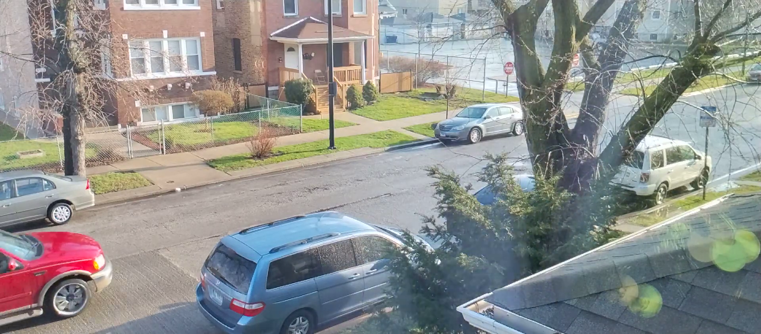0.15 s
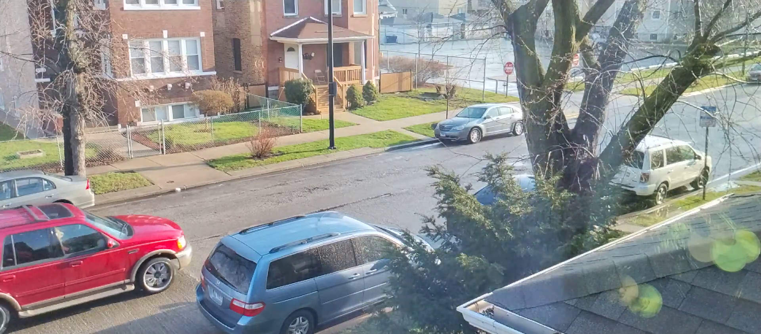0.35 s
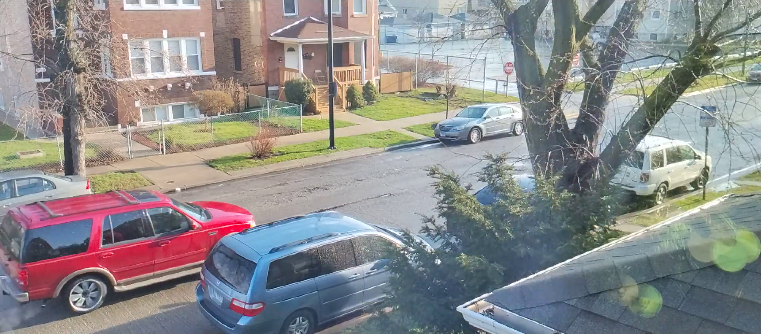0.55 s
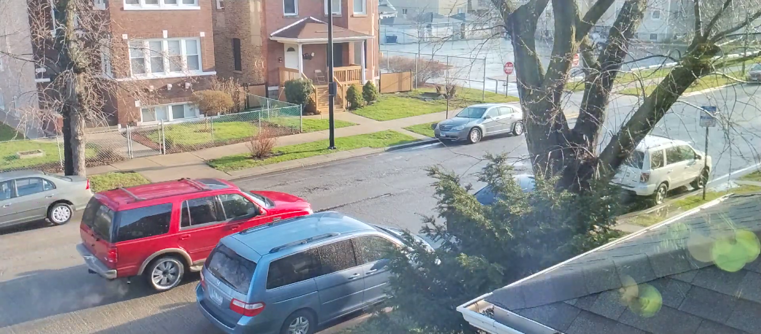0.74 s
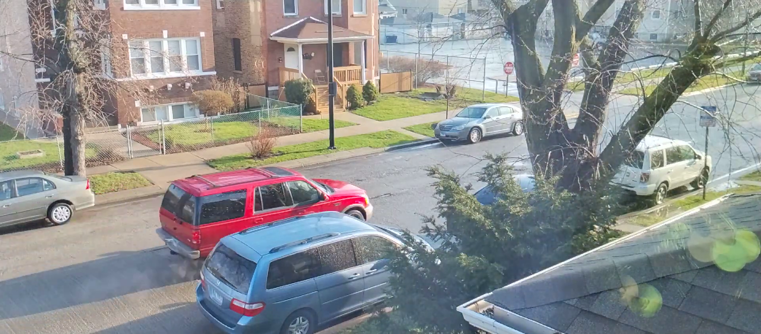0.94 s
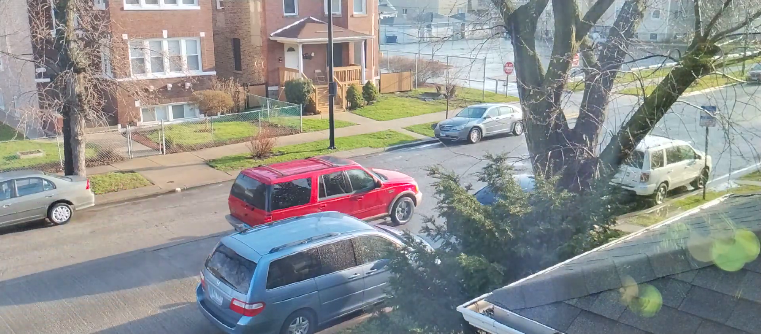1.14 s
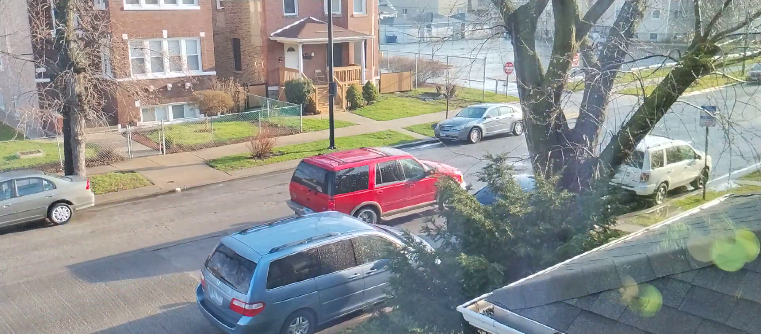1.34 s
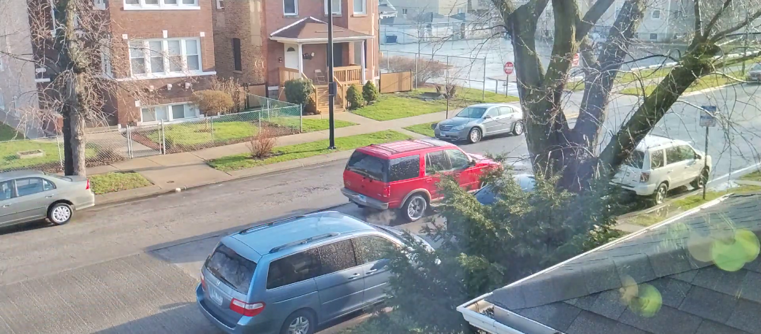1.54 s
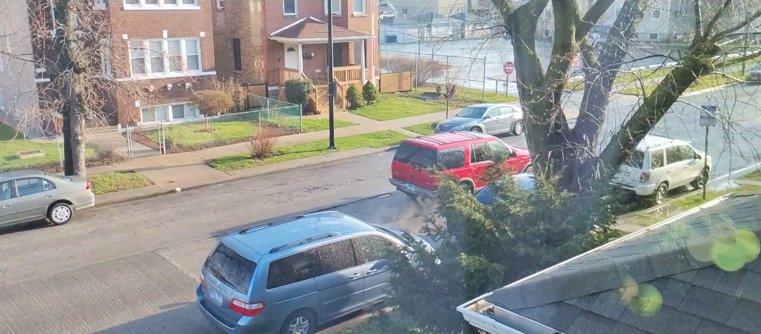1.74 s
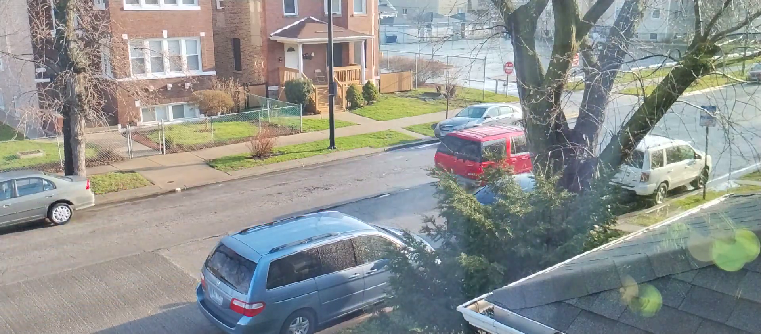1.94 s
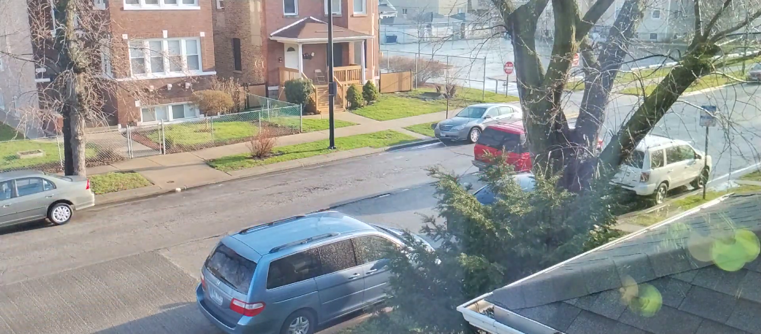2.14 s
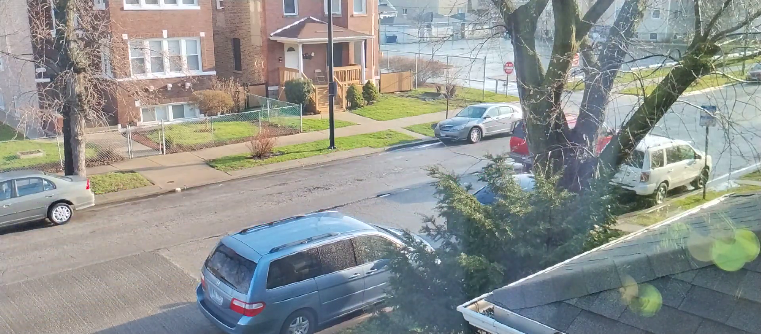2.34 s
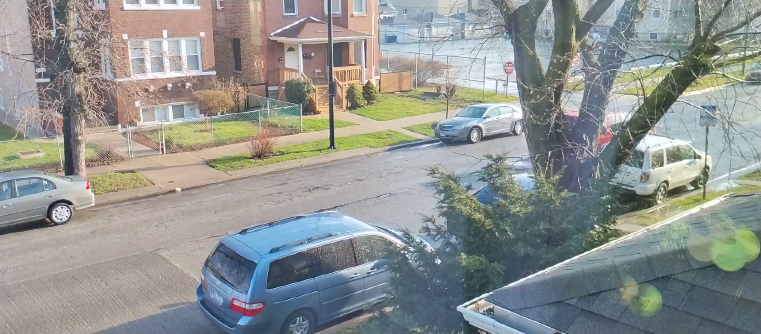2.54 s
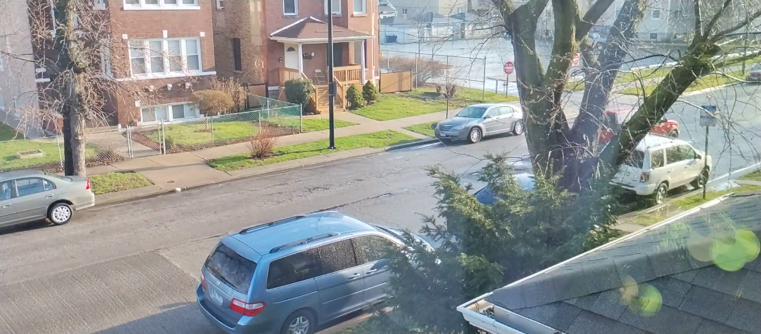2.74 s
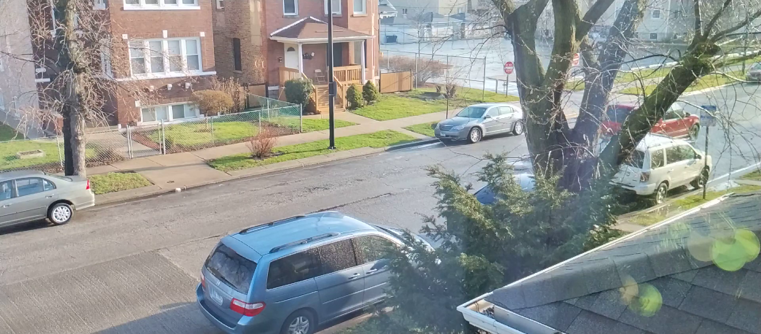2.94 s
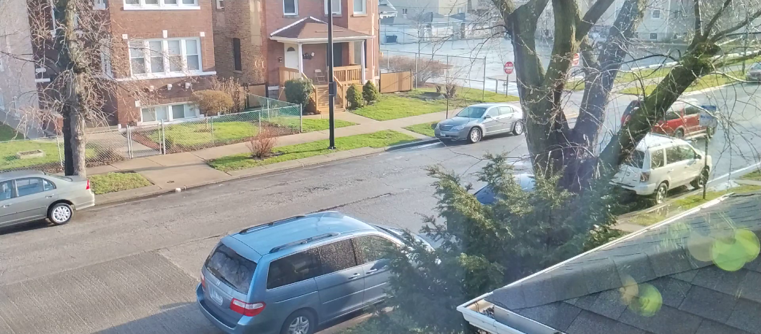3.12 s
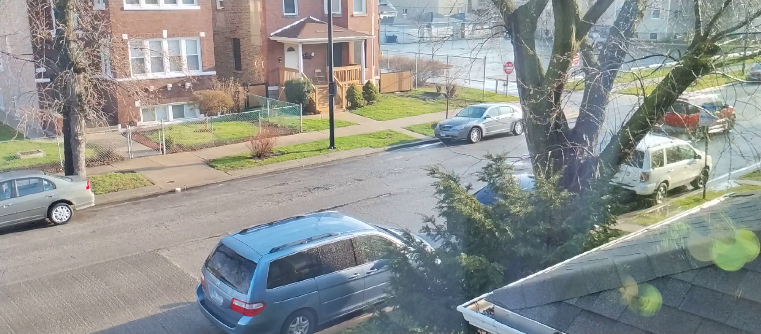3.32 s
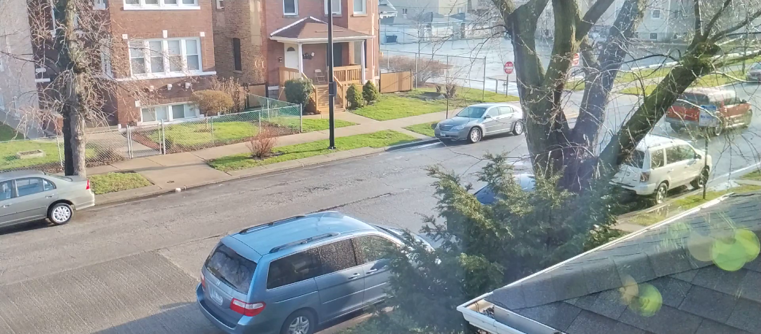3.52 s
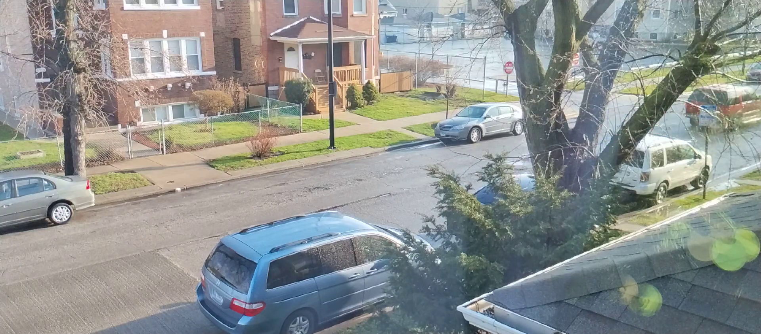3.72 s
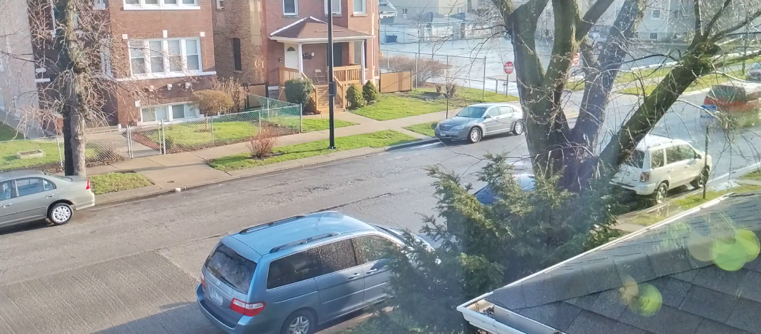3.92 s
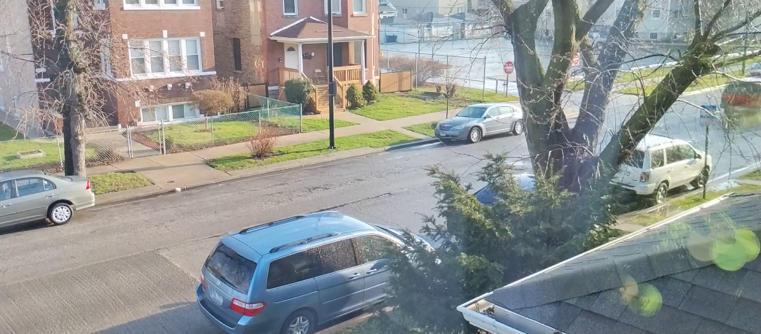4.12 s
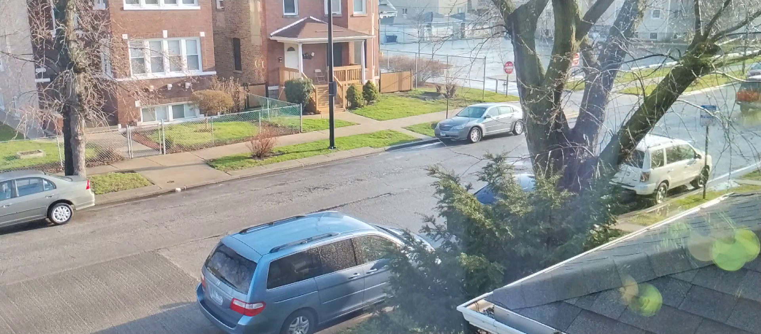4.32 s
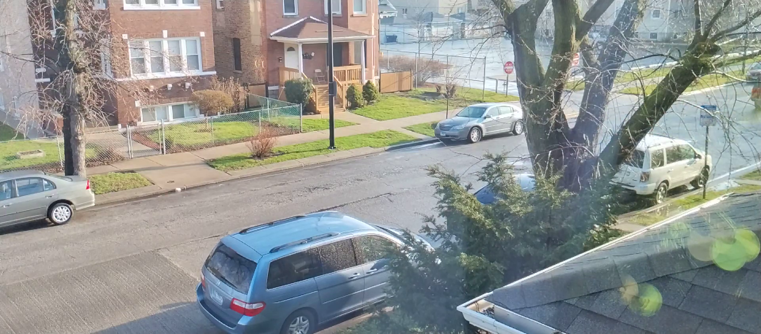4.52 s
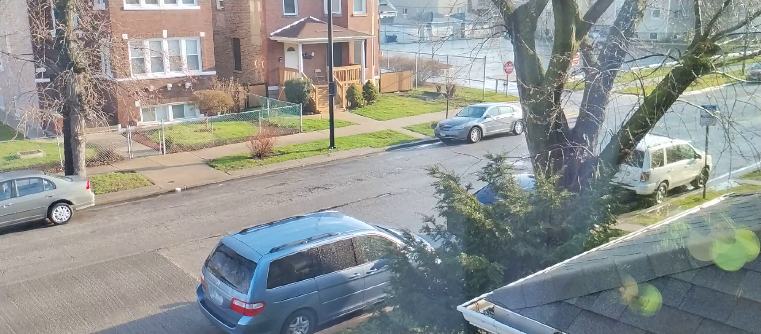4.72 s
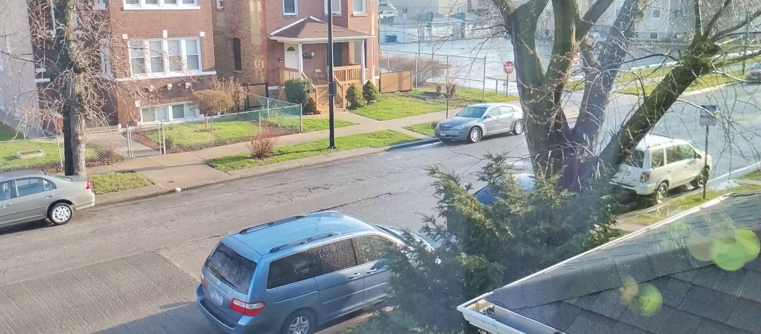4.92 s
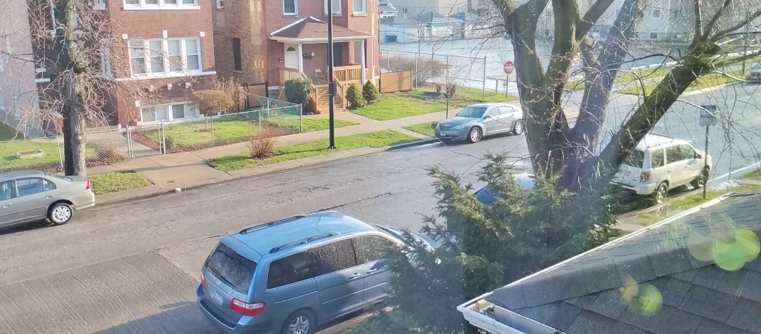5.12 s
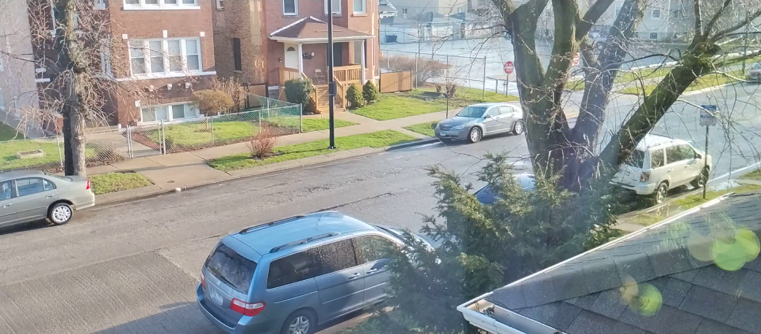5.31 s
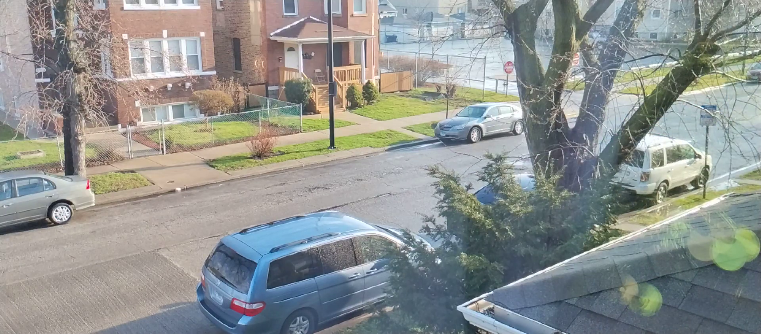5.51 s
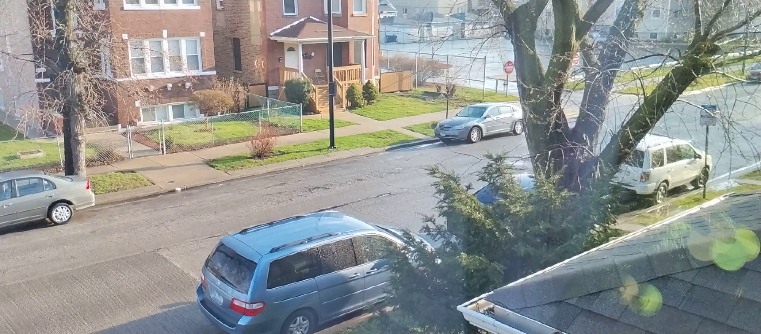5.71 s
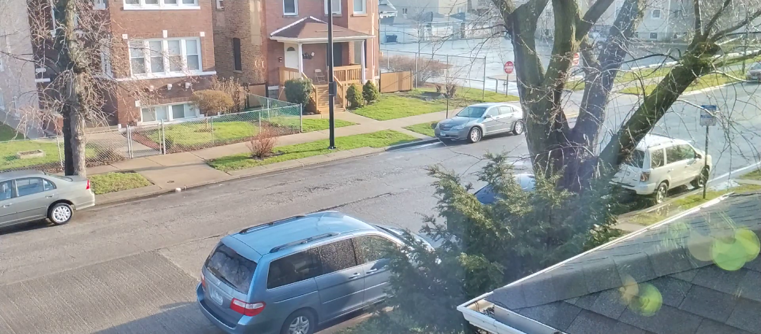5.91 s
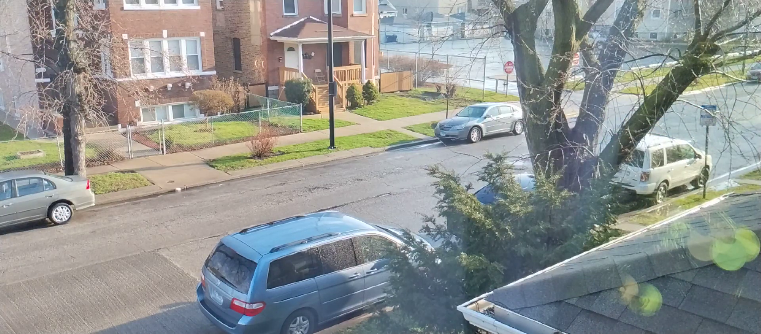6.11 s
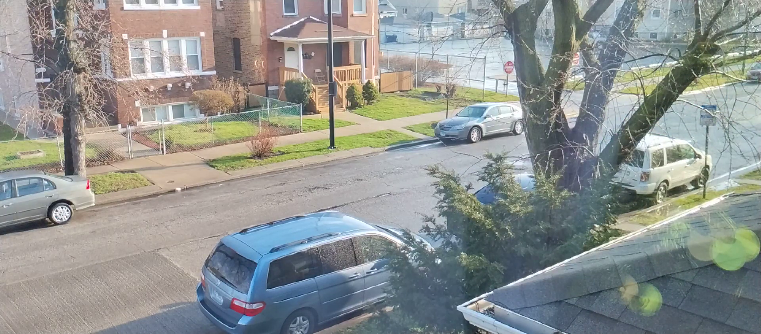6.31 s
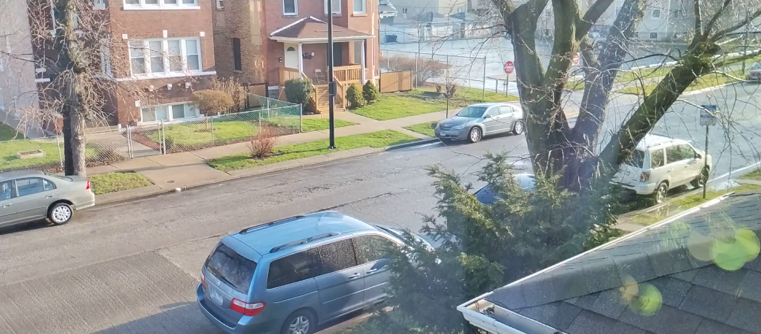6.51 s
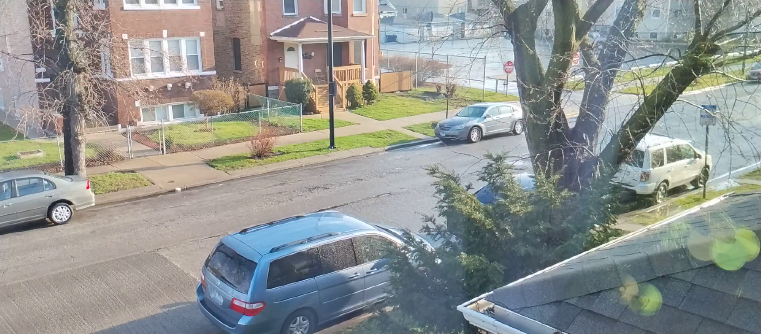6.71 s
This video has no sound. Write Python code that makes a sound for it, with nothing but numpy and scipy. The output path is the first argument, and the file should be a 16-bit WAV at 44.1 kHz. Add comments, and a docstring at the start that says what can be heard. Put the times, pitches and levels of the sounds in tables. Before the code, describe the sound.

Close inside a bare upstairs room, a window frame is pushed along its track in two rough bursts, rumbling, scraping and thudding. A car's low muffled rumble passes beneath and fades, and a smooth surface swishes by. The movement dies away, a hard catch snaps with a brief metallic ring, then quiet footfalls, small knocks, clicks and rustles remain over faint hiss.

```python
"""Indoors at an upstairs window, a frame, something like a sash, judders along its track in two pushes: noisy
friction follows the push, and blows mark the jolts. Meanwhile a car rolls by below, low filtered noise that
follows its distance, and a surface swishes past on dense slips. The frame bumps home under a faint high hiss
and a catch snaps shut with ringing modes. Then footfalls, small knocks, clicks and soft rustles of sparse
slips sound in the bare room. A faint steady hiss lies under it all."""
import sys
import numpy as np
from scipy import signal
from scipy.fft import rfft, irfft, next_fast_len
from scipy.io import wavfile
from scipy.ndimage import uniform_filter1d

SR = 44100
rng = np.random.default_rng(int(sys.argv[2]) if len(sys.argv) > 2 else 0)


def master(y):
    """Save y as 16-bit WAV."""
    cut = np.clip(np.atleast_2d(y).T, -1, 1)
    pcm = np.round(cut * 32767)  # scale
    wavfile.write(sys.argv[1], SR, pcm.astype(np.int16))


N = 297965  # samples

# Colour tables give relative spectra; blow levels hold before ring boost and stereo balance.

# frame pushed twice, then settling: time_s, push_rumble_db, binding_scrape_db
SLIDE_LEVELS = [(0,-47,-43.5),(.1,-46,-45),(.15,-49,-50.5),(.32,-48,-52),(.42,-41,-44),(.59,-44,-50.5),(.65,-52,-60),(.8,-46.5,-55),(1.08,-45.5,-51),(1.2,-39.5,-44.5),(1.35,-41,-37),(1.48,-42.5,-52),(1.68,-41,-52),(1.96,-45,-54),(2.12,-62,-77),(2.4,-79,-65),(2.75,-63.5,-69),(3.05,-107,-84.5)]
# friction spectrum of the frame: freq_hz, density_db_per_hz
SLIDE_SPECTRUM = [(24,-77),(45,-30),(72,-0.5),(105,9),(135,-3.5),(240,-2.5),(380,-17),(550,-15),(900,-21),(1250,-19),(1500,-16.5),(3060,-17),(4320,-26),(6710,-26.5),(14000,-53)]
RASP_RE_RUMBLE_DB = -10


def sliding_frame():
    """The push makes the frame rumble and the track rasp; the edges scrape where they bind."""
    slips = friction(SLIDE_SPECTRUM, slips_per_s=900, spread_db=-1.5, t60_s=0.17)
    rumble, scrape, rasp = [levelled(part) for part in zones(slips)]
    push, binding = gains(SLIDE_LEVELS)
    return push * (rumble + amp(RASP_RE_RUMBLE_DB) * rasp) + binding * scrape


# frame jolts in its track: start_s, thud_db, clack_minus_thud_db, t60_s, ring_hz, ring_boost_db
JOLT_BLOWS = [(.191,-41,-10.5,.26,527,9),(.218,-46.5,-7.5,0.094,704,10),(.256,-45,-8,0.3,603,6),(.335,-43.5,-19,0.32,376,9),(.412,-32,-31.5,0.204,173,-2),(0.474,-43,-16,0.12,230,0),(.514,-53.5,-16,0.35,136,16),(1.115,-48.5,-11,0.24,286,24),(1.222,-41,-29,0.54,133,9),(1.512,-31,-34.5,0.35,200,4),(1.775,-45,-15.5,0.091,570,10.5),(1.851,-34.5,-12,0.38,233,5.5),(2.153,-59.5,-17,0.24,110,13),(2.508,-47,-13,0.3,460,3),(2.548,-58,2.5,0.13,258,19.5)]
# spectrum of the jolts: freq_hz, density_db_per_hz
JOLT_SPECTRUM = [(24,-30),(40,-14.5),(115,3),(222,-7.5),(421,-10.5),(620,-10),(900,-14),(1580,-18.5),(2400,-19.5),(3300,-22),(4320,-31.5),(6390,-32),(9000,-55),(14000,-91)]


def jolts():
    """The frame bumps along its track: millisecond contacts with a strong first front."""
    return sum(blow(*row, JOLT_SPECTRUM, contact_s=0.002, middle_db=0.5, direct=3.0, q=7.8)
               for row in JOLT_BLOWS)


# catch snap and rebounds: start_s, thud_db, clack_minus_thud_db, ring_hz
CATCH_SNAPS = [(3.141,-54,8,503),(3.149,-48.5,9.5,1720),(3.166,-48.5,7,440),(3.186,-47.5,-3,214)]
# spectrum of hard contacts, catch and ticks: freq_hz, density_db_per_hz
HARD_SPECTRUM = [(35,-44),(60,-15),(160,-7.5),(215,2),(348,-10),(512,-3),(738,-8),(886,-1),(1090,-7.5),(1300,-3),(2500,-5),(4300,-19.5),(6000,-23),(6900,-28.5),(8000,-38.5),(14000,-66)]
# metal of the catch ringing on: freq_hz, level_re_ring_db, t60_s
METAL_MODES = [(1210, -13, 0.42), (1300, -16, 0.28), (1590, 0, 0.14), (1879, -11, 0.28), (2040, -12, 0.39),
               (2480, -11, 0.33), (2660, -1, 0.35), (2918, -6, 0.19), (3200, -22, 0.39), (3620, -14, 0.24),
               (3801, -21, 0.27), (5070, -21, 0.18), (5464, -32, 0.47), (6002, -27, 0.32)]
SNAP_T60_S, CATCH_RING_DB = 0.33, -45


def catch():
    """A hard snap rebounds quickly; its metal modes decay from the second contact, the first full hit."""
    snaps = sum(blow(start_s, thud_db, bright_db, SNAP_T60_S, ring_hz, 2.5, HARD_SPECTRUM,
                     contact_s=0.00022, middle_db=-1.0, direct=1.9, q=5.9)
                for start_s, thud_db, bright_db, ring_hz in CATCH_SNAPS)
    t = np.arange(SR) / SR
    ring = 0
    for hz, db, t60_s in METAL_MODES:
        cycles = hz * t + rng.random((2, 1)) / 4
        ring = ring + amp(db - 60 * t / t60_s) * np.sin(2 * np.pi * cycles)
    full_hit_s = CATCH_SNAPS[1][0]
    return snaps + amp(CATCH_RING_DB) * placed(ring, full_hit_s)


# dry ticks of hard parts: start_s, thud_db, clack_minus_thud_db, ring_hz, ring_boost_db
TICK_BLOWS = [(0.1096,-61.5,12,1320,12),(1.8473,-29,-36.5,940,9),(2.462,-54.5,-29,1040,13.5)]
TICK_T60_S = 0.04


def ticks():
    """Hard parts meet for a tenth of a millisecond: short and dry."""
    return sum(blow(start_s, thud_db, bright_db, TICK_T60_S, ring_hz, boost_db, HARD_SPECTRUM,
                    contact_s=0.00011, middle_db=5.0, direct=1.8, q=6.8)
               for start_s, thud_db, bright_db, ring_hz, boost_db in TICK_BLOWS)


# smooth surface brushing past: start_s, hold_s, level_db
SWISH_STROKES = [(.9,0.17,-43),(2.55,0.044,-61.5)]
# treble spectrum of fine friction and clicks: freq_hz, density_db_per_hz
FINE_SPECTRUM = [(900,-44.5),(1400,-0.5),(1750,-6.5),(2200,-1.5),(2900,0),(4200,-3),(5200,-4.5),(6600,-4.5),(8000,-10),(9500,-17.5),(14000,-28)]


def swish():
    """Fine, dense friction of a smooth surface brushing past."""
    slips = friction(FINE_SPECTRUM, slips_per_s=3200, spread_db=4.0, t60_s=0.089)
    return swells(SWISH_STROKES, rise_db_per_s=124, fall_db_per_s=149) * levelled(slips)


# soft footfalls: start_s, thud_db, ring_hz
FOOTFALL_BLOWS = [(3.707,-65.5,600),(4.315,-63.5,175),(4.97,-73,173),(5.44,-65.5,254),(5.965,-71.5,570),(6.527,-67.5,620)]
# spectrum of footfalls and knocks: freq_hz, density_db_per_hz
FLOOR_SPECTRUM = [(29,-18),(50,-22),(90,3),(140,-6.5),(185,-5),(250,-13),(350,-10),(500,-10),(780,-12),(1100,-7),(1400,-5),(2170,-4.5),(2820,-4.5),(4010,-15.5),(6900,-19),(9380,-38),(14000,-44)]
FOOTFALL_T60_S = 0.58


def footfalls():
    """Soft contacts further off: a weak first front, mostly room."""
    return sum(blow(start_s, thud_db, -10.5, FOOTFALL_T60_S, ring_hz, 9.5, FLOOR_SPECTRUM,
                    contact_s=0.005, middle_db=-2.5, direct=0.72, q=4.3)
               for start_s, thud_db, ring_hz in FOOTFALL_BLOWS)


# light knocks: start_s, thud_db, clack_minus_thud_db, t60_s, ring_hz, ring_boost_db
KNOCK_BLOWS = [(2.644,-54,-4,0.24,2000,10),(4.357,-52,2.5,.37,1355,10),(4.968,-69,-4,0.19,2980,11),(5.047,-66,7.5,0.36,2000,6),(5.495,-62.5,-3.5,0.62,396,1),(5.641,-67.5,0,0.38,620,4),(6.059,-80,7.5,0.66,1530,9),(6.138,-70.5,8,0.35,1420,8.5),(6.562,-70.5,4,0.51,1410,11)]


def knocks():
    """Light blows further off, each with its own pitch and decay."""
    return sum(blow(*row, FLOOR_SPECTRUM, contact_s=0.0033, middle_db=-7, direct=1.0, q=8.2)
               for row in KNOCK_BLOWS)


# tiny bright clicks: start_s, level_db, ring_hz
CLICK_HITS = [(3.673,-69,3600),(4.44,-62.5,7140),(4.695,-72.5,3170),(5.285,-72,2800)]


def clicks():
    """Small hard things touch: mostly treble, each with a pitch of its own."""
    out = 0
    for start_s, db, ring_hz in CLICK_HITS:
        touch = colour(echoes(contact_s=0.004, t60_s=0.18), FINE_SPECTRUM)
        ring = resonate(touch, ring_hz, boost_db=14, q=5.0)
        out = out + placed(amp(db) * ring / mid_rms(ring[:, :SR // 20]), start_s)
    return out


# faint high hiss, then soft rustles: start_s, hold_s, level_db
FAINT_STROKES = [(2.05,0.84,-73.5),(3.82,.15,-67.5),(4.49,.01,-63.5),(4.95,0.11,-67),(5.53,0.025,-67),(5.88,0.085,-75.5),(6.15,0.012,-66.5),(6.6,.05,-69.5)]


def high_hiss_and_rustles():
    """Sparse treble slips of very uneven size: a faint high hiss, then soft rustles."""
    slips = friction(FINE_SPECTRUM, slips_per_s=750, spread_db=5.0, t60_s=0.17)
    return swells(FAINT_STROKES, rise_db_per_s=111, fall_db_per_s=100) * slips


# car spectrum through the glass: freq_hz, density_db_per_hz
CAR_SPECTRUM = [(25,-19.5),(40,-9.5),(56,-2),(75,-4.5),(100,2),(140,-10),(250,-10),(500,-20.5),(800,-15),(1200,-22.5),(2500,-39.5),(8000,-37)]
CAR_NEAREST_DB, CAR_NEAREST_S, CAR_NEAREST_M, CAR_M_PER_S = -51, 0.7, 12.3, 9.5
CAR_LOSS_DB_PER_DOUBLING = 13  # houses and trees: faster fade than in the open


def car():
    """Tyre and engine rumble as filtered noise; steady speed past the window sets distance and level."""
    along_m = CAR_M_PER_S * (np.arange(N) / SR - CAR_NEAREST_S)
    doublings = np.log2(np.hypot(along_m, CAR_NEAREST_M) / CAR_NEAREST_M)
    return amp(CAR_NEAREST_DB - CAR_LOSS_DB_PER_DOUBLING * doublings) * steady(CAR_SPECTRUM)


# room hiss spectrum: freq_hz, density_db_per_hz
HISS_SPECTRUM = [(25,-14),(50,1.5),(72,-1),(105,11),(150,4),(230,2.5),(330,-5),(520,-12),(800,-11.5),(1100,-10),(1800,-13),(2500,-10),(3700,-8),(4900,-17),(6300,-9),(7500,-17.5),(14000,-20)]
HISS_DB = -67.5


def room_hiss():
    """Faint diffuse noise at constant level."""
    return amp(HISS_DB) * steady(HISS_SPECTRUM)


def blow(start_s, thud_db, bright_db, t60_s, ring_hz, ring_db, spectrum, contact_s, middle_db, direct, q):
    """One blow in the room: separate thud, middle and clack levels, plus the struck part's pitch."""
    parts = zones(colour(echoes(contact_s, t60_s, direct), spectrum))
    levels_db = thud_db, thud_db + bright_db / 2 + middle_db, thud_db + bright_db
    attack = int(max(0.028, t60_s / 6) * SR)  # samples over which levels hold
    hit = sum(amp(db) * part / mid_rms(part[:, :attack]) for db, part in zip(levels_db, parts))
    return placed(resonate(hit, ring_hz, ring_db, q), start_s)


def resonate(x, hz, boost_db, q):
    """The struck part favours one pitch: a resonant peak added to the sound."""
    peak = signal.lfilter(*signal.iirpeak(hz, q, fs=SR), x)
    return x + (amp(boost_db) - 1) * peak


def friction(spectrum, slips_per_s, spread_db, t60_s, points=7):
    """Tiny slips of uneven size at several contact points, each point ringing in its own way."""
    sizes = amp(spread_db * np.minimum(rng.exponential(1, N), 4)) * rng.choice([-1, 1], N)
    slips = sizes * (rng.random(N) < slips_per_s / SR)
    point = rng.integers(0, points, (1, N))
    sound = 0
    for k in range(points):
        ring = colour(echoes(1e-4, t60_s), spectrum)
        sound = sound + signal.oaconvolve(slips * (point == k), ring, axes=1)[:, :N]
    return sound / mid_rms(sound)


# decay by frequency: freq_hz, share_of_t60
T60_SHARES = [(100,0.5),(400,1.0),(1500,1.1542),(3000,1.0),(5500,0.9),(11000,1.56)]


def echoes(contact_s, t60_s, direct=2.26, direct_s=0.0013):
    """The room's answer to one blow: a first front, then dense reflections with a decay per octave."""
    t = np.arange(SR * 3 // 5) / SR
    front = (1 - np.exp(-t / contact_s)) * (1 + direct * np.exp(-t / direct_s))
    return diffuse(len(t), lambda hz: front * amp(-60 * t / (t60_s * at_hz(T60_SHARES, hz))))


def steady(spectrum):
    """Smooth diffuse noise whose channel mean has rms 1."""
    noise = colour(diffuse(N, lambda hz: 1), spectrum)
    return noise / mid_rms(noise)


# left-right correlation: freq_hz, correlation
CORRELATION = [(80,1),(170,0.92),(340,0.89),(680,0.4),(1350,-0.33),(2700,0.078),(9000,-0.069)]
# octave-like band edges: edge_hz
BAND_EDGES = [20, 120, 240, 480, 960, 1900, 3800, 7500, 16000]


def diffuse(n, envelope):
    """Sound from all sides, most alike at both microphones in the bass; envelope(hz) shapes each band."""
    out = 0
    for low, high in zip(BAND_EDGES, BAND_EDGES[1:]):
        hz = np.sqrt(low * high)
        alike = np.clip(at_hz(CORRELATION, hz), -0.99, 0.99)
        shape = envelope(hz)
        pair = band(rng.standard_normal((2, n)) * shape, low, high)
        level = np.sqrt((high - low) * np.mean(shape ** 2))  # flat density per Hz
        mid, side = pair / pair.std(1, keepdims=True) * level
        out = out + np.sqrt(1 + alike) * mid + np.sqrt(1 - alike) * side * [[1], [-1]]
    return out


def colour(x, spectrum):
    """Minimum-phase filter with the given spectrum: nothing sounds early."""
    n = x.shape[-1]
    half = next_fast_len(n // 2 + 2048)
    hz = np.arange(half + 1) * SR / (2 * half)
    cepstrum = irfft(np.log(amp(at_hz(spectrum, hz))))
    cepstrum[1:half] *= 2  # fold onto the causal side
    cepstrum[half + 1:] = 0
    return irfft(rfft(x, 2 * half) * np.exp(rfft(cepstrum)))[..., :n]


# low, middle and high zone: low_hz, high_hz
ZONE_EDGES = [(40, 300), (300, 1200), (1200, 18000)]


def zones(x):
    """Low, middle and high part, filtered forward and backward to stay in step."""
    return [band(band(x, *edges)[..., ::-1], *edges)[..., ::-1] for edges in ZONE_EDGES]


def band(x, low_hz, high_hz):
    """Causal band-pass."""
    sos = signal.butter(2, [low_hz, high_hz], "band", fs=SR, output="sos")
    return signal.sosfilt(sos, x + 1e-18)


def swells(rows, rise_db_per_s, fall_db_per_s):
    """Gain of a run of strokes: each rises, holds and falls away."""
    t = np.arange(N) / SR
    gain = 0
    for start_s, hold_s, db in rows:
        rise_db = rise_db_per_s * np.maximum(start_s - t, 0)
        fall_db = fall_db_per_s * np.maximum(t - start_s - hold_s, 0)
        gain = gain + amp(db - rise_db - fall_db)
    return gain


def levelled(x):
    """Rms 1 over every tenth of a second; the quick grain stays."""
    return x / np.sqrt(np.abs(uniform_filter1d(x.mean(0) ** 2, SR // 10)) + 1e-12)


def placed(x, start_s):
    """A short stereo sound set at its moment in the scene."""
    return np.pad(x, ((0, 0), (int(start_s * SR), N)))[:, :N]


def gains(rows):
    """Each dB column of a curve as a gain per sample."""
    time_s, *columns_db = np.transpose(rows)
    return [amp(np.interp(np.arange(N) / SR, time_s, db)) for db in columns_db]


def at_hz(points, hz):
    """Read a table on a log-frequency axis."""
    freq_hz, value = np.transpose(points)
    return np.interp(np.log(np.maximum(hz, 1)), np.log(freq_hz), value)


def mid_rms(x):
    """Rms of the mean of both channels."""
    return np.sqrt(np.mean(x.mean(0) ** 2) + 1e-24)


def amp(db):
    """Decibels to gain."""
    return 10 ** (np.asarray(db) / 20)


def lean(x, balance):
    """Share a sound between the two microphones, frequency by frequency."""
    left = colour(x[0], [(hz, db / 2) for hz, db in balance])
    right = colour(x[1], [(hz, -db / 2) for hz, db in balance])
    return np.array([left, right])


# all but the swish, to the left: freq_hz, left_minus_right_db
MAIN_BALANCE = [(40,10),(130,1.5),(280,2.1),(520,7),(1000,4.75),(2200,6.6),(4500,7.2),(6500,5.4),(8500,6.7),(12000,3.3)]
# swish, to the right at the very top: freq_hz, left_minus_right_db
SWISH_LEAN = [(1200,-2.5),(2250,4),(4100,12.5),(7500,12.5),(10000,-2),(13800,-5)]


def scene():
    """All layers lean left together, except the swish with its own balance."""
    window = sliding_frame() + jolts() + catch() + ticks()
    movements = footfalls() + knocks() + clicks() + high_hiss_and_rustles()
    background = car() + room_hiss()
    return lean(window + movements + background, MAIN_BALANCE) + lean(swish(), SWISH_LEAN)


CUTOFF_HZ = 14300


def record(dry):
    """A steep elliptic low-pass cuts the top."""
    return signal.sosfilt(signal.ellip(12, 0.1, 70, CUTOFF_HZ, fs=SR, output="sos"), dry)


dry = scene()
out = record(dry)
master(out)
```